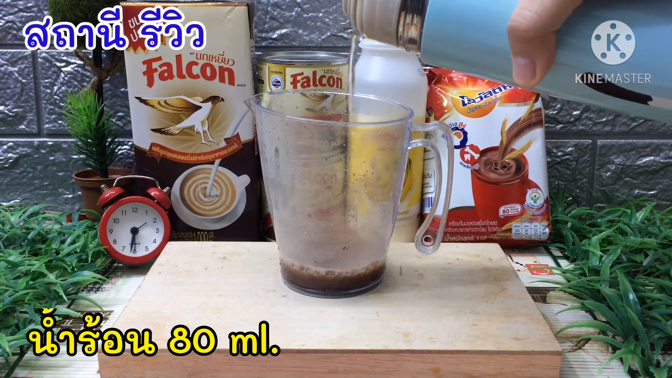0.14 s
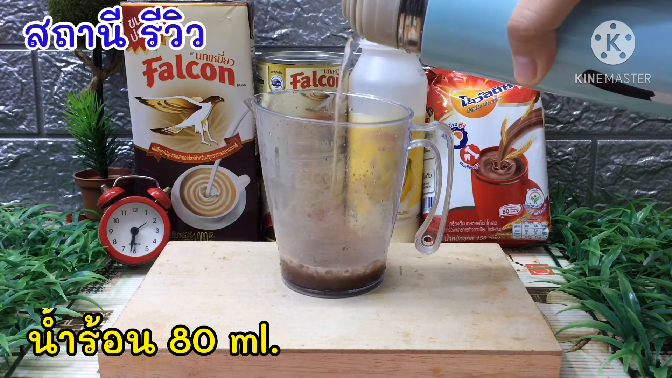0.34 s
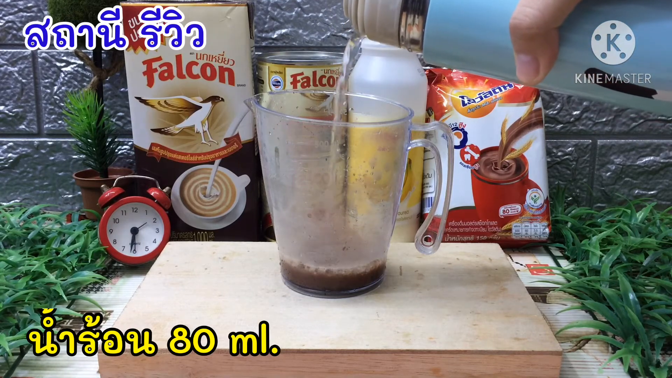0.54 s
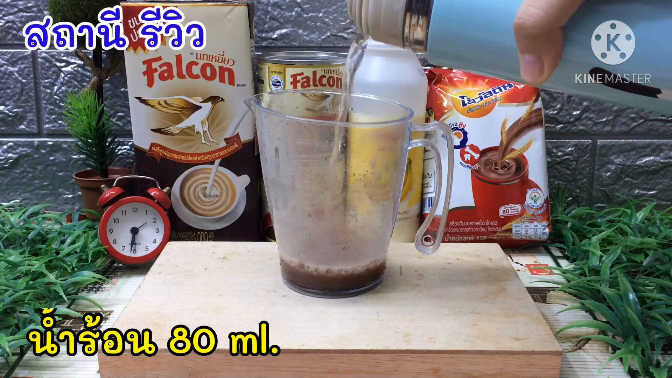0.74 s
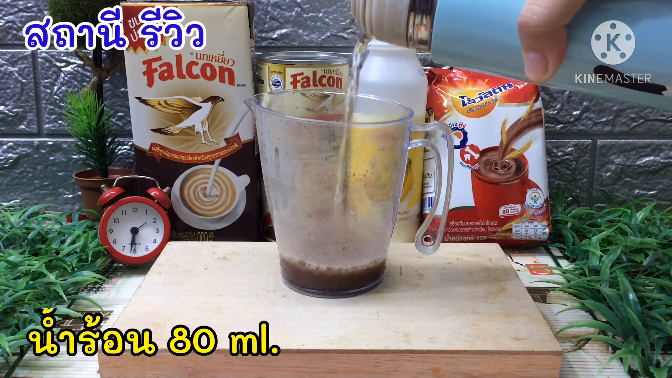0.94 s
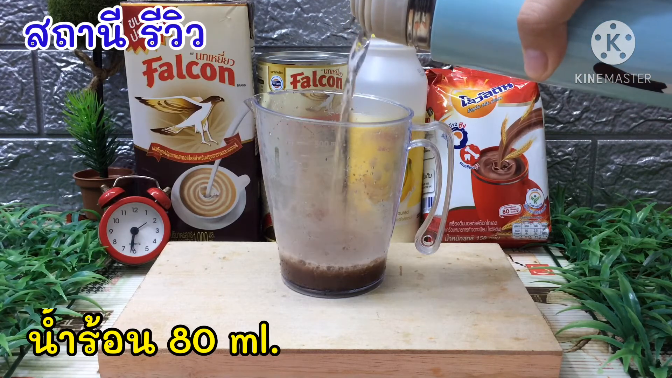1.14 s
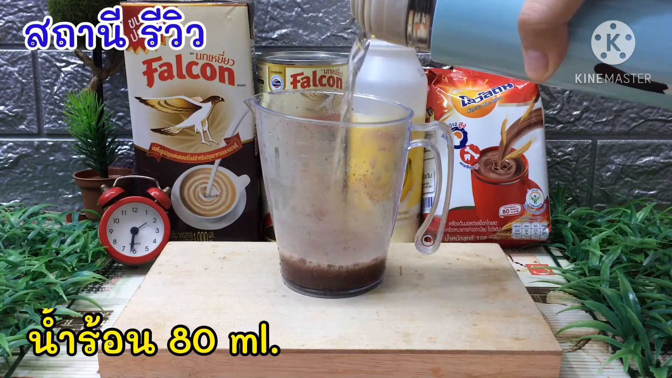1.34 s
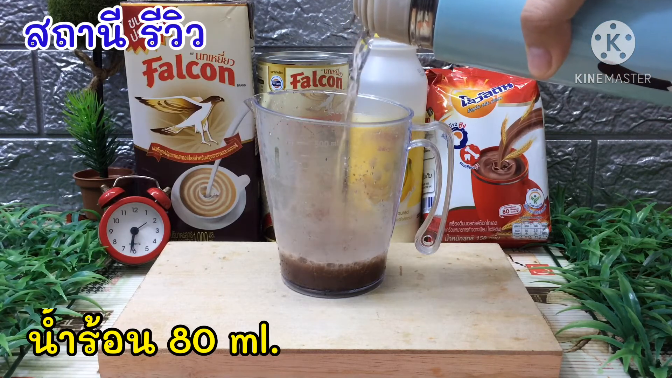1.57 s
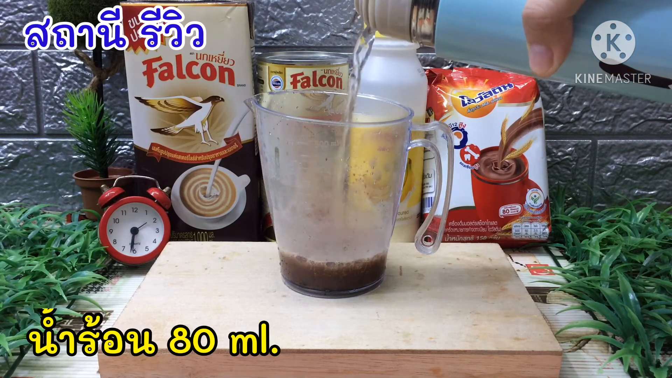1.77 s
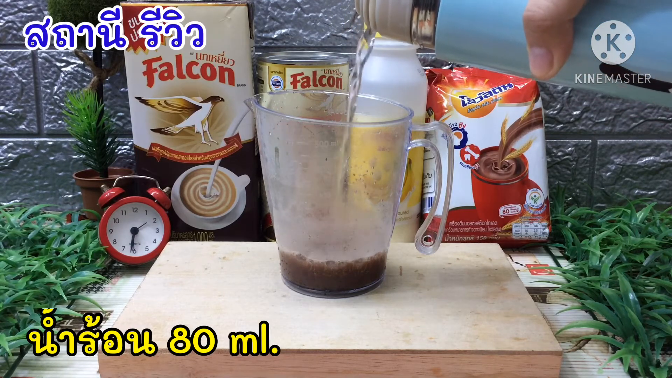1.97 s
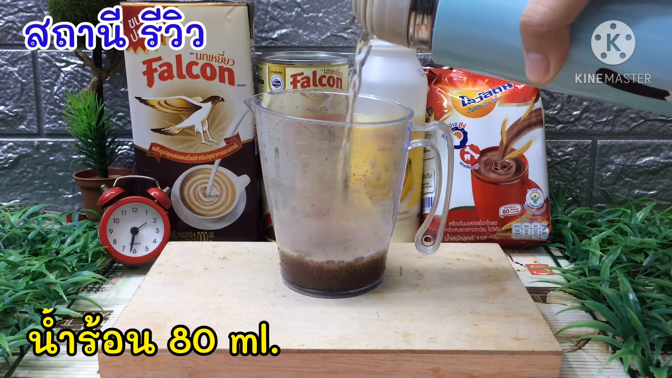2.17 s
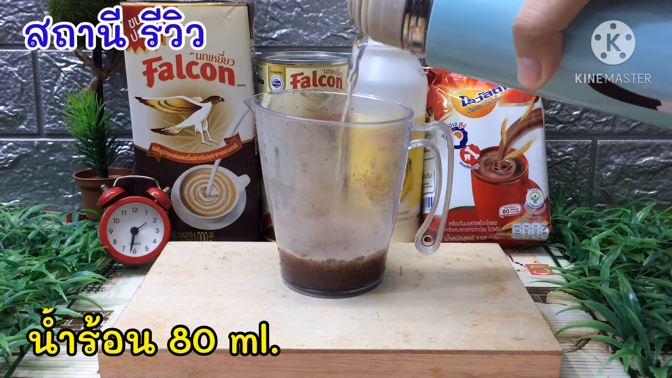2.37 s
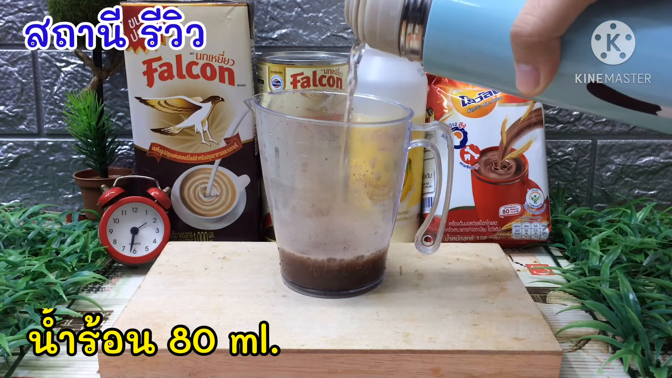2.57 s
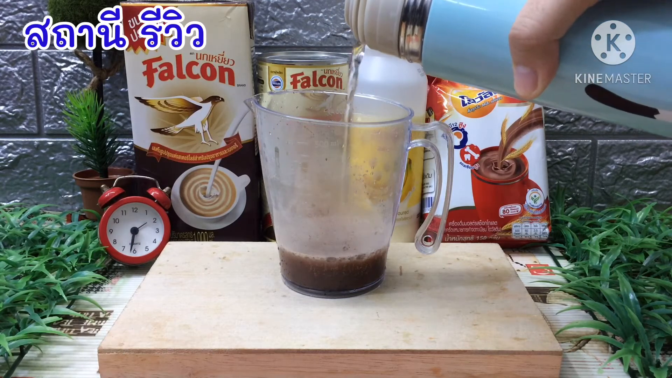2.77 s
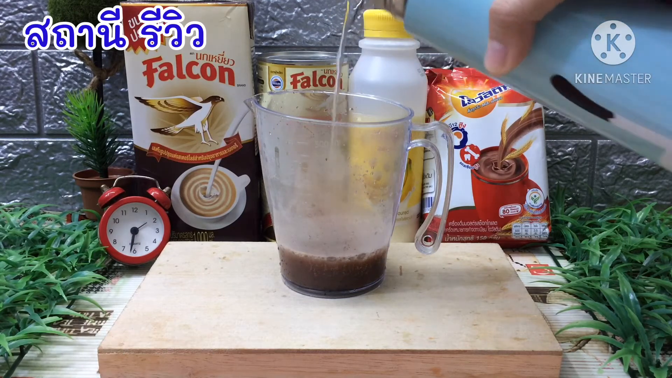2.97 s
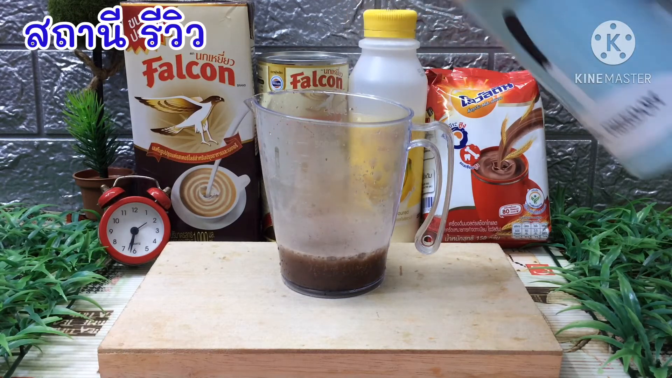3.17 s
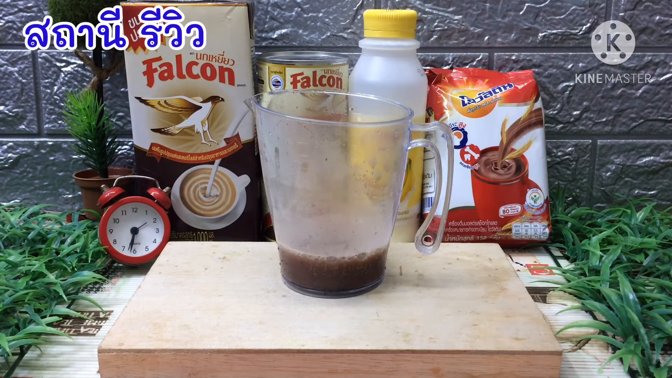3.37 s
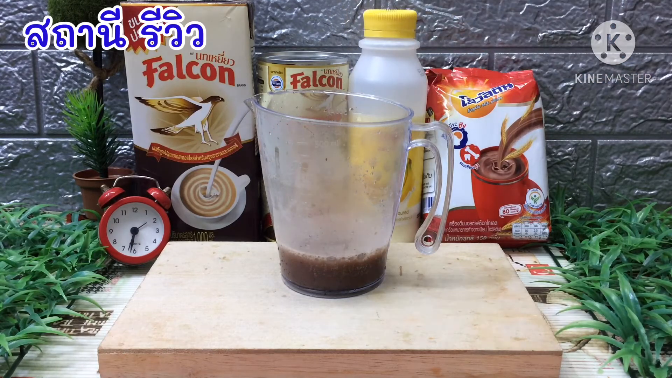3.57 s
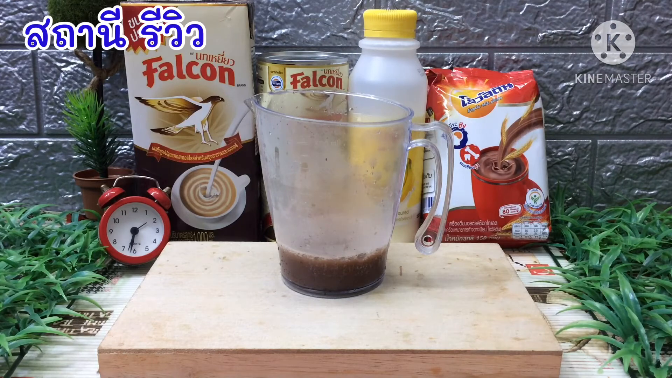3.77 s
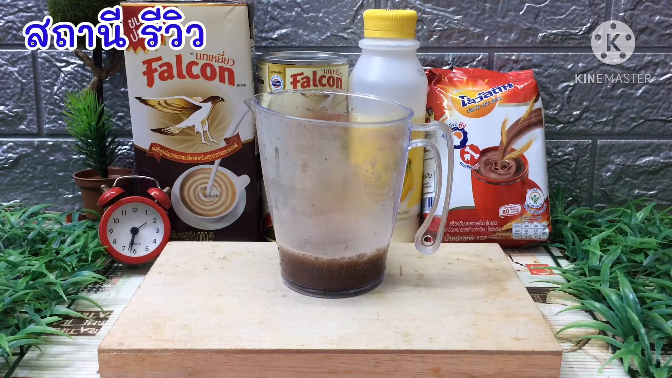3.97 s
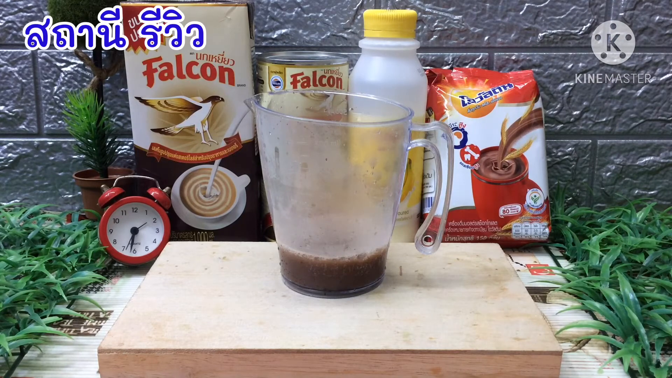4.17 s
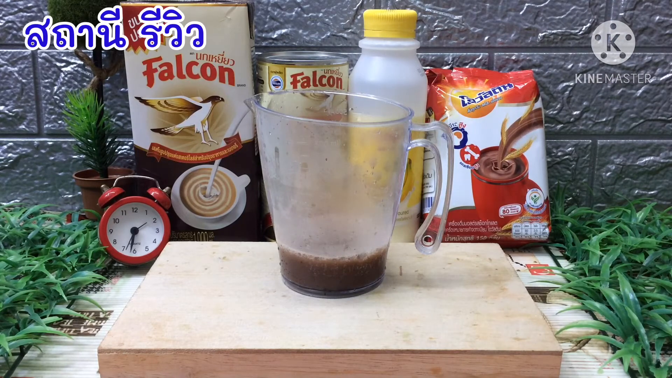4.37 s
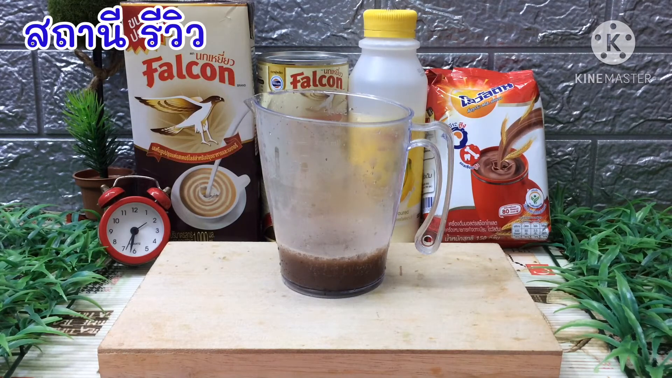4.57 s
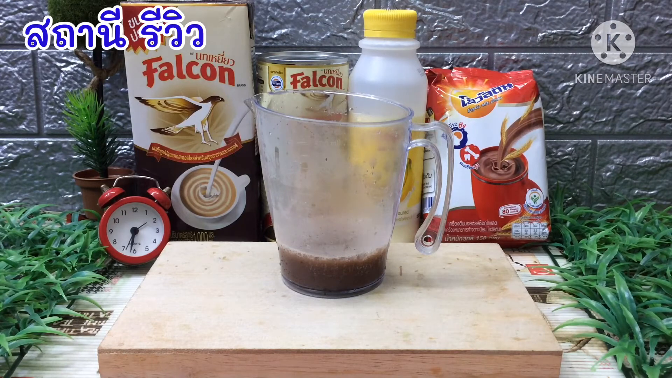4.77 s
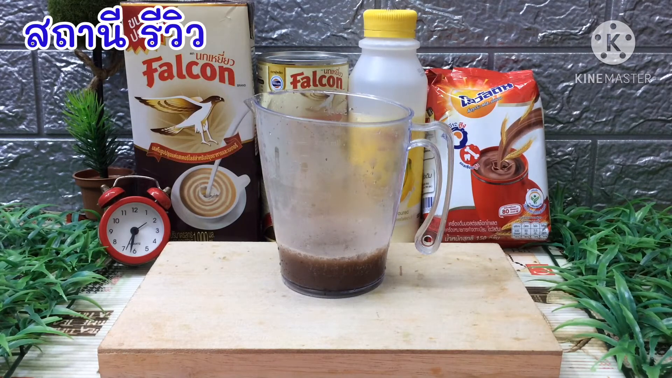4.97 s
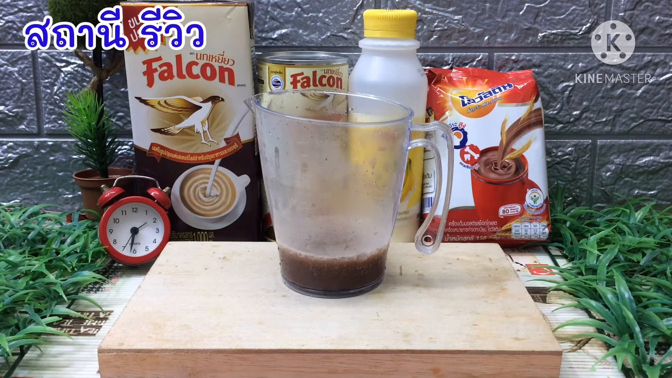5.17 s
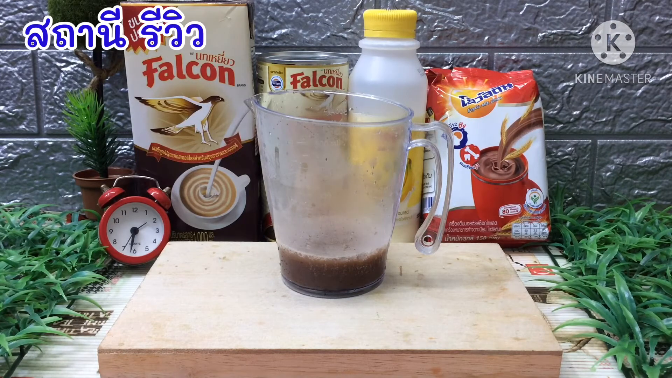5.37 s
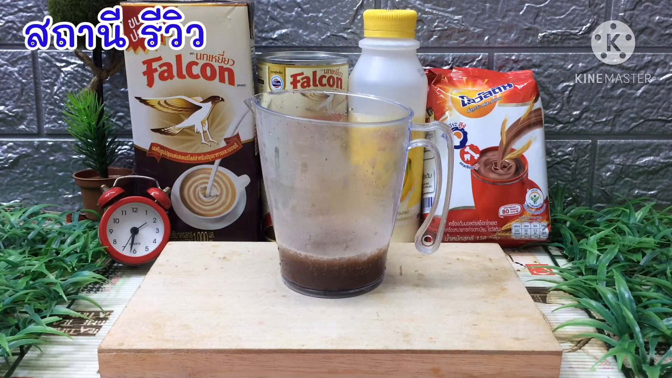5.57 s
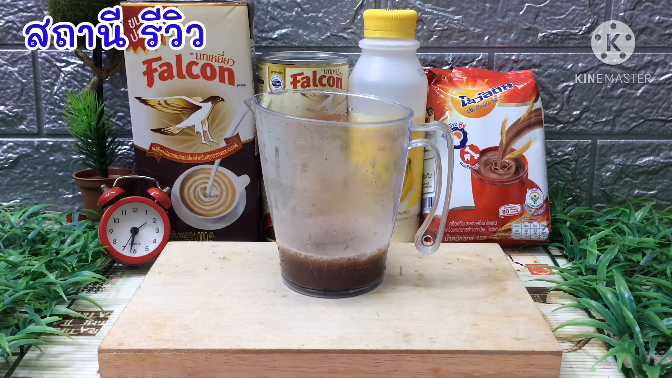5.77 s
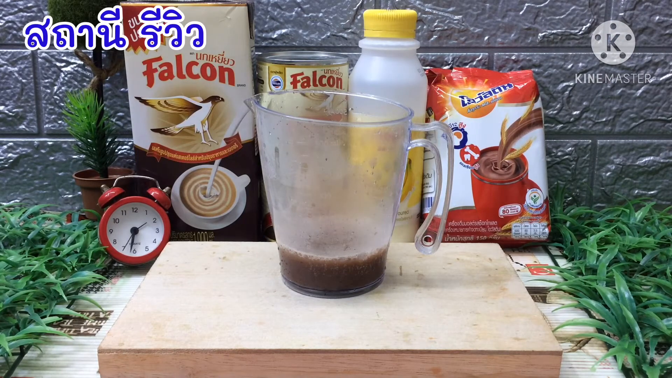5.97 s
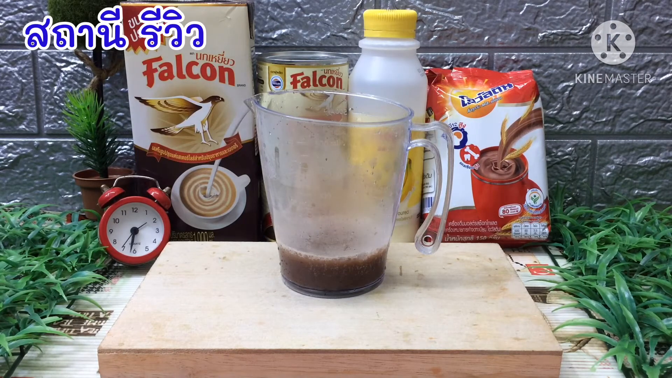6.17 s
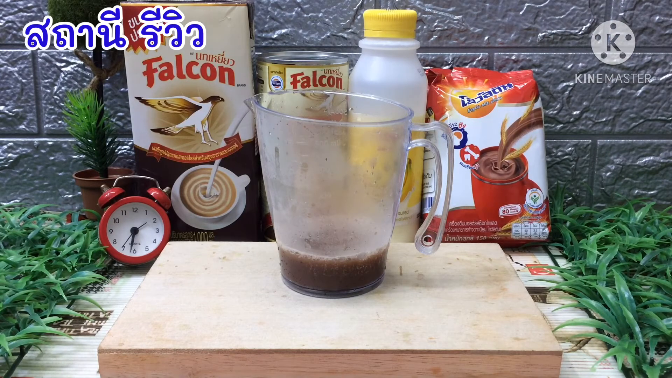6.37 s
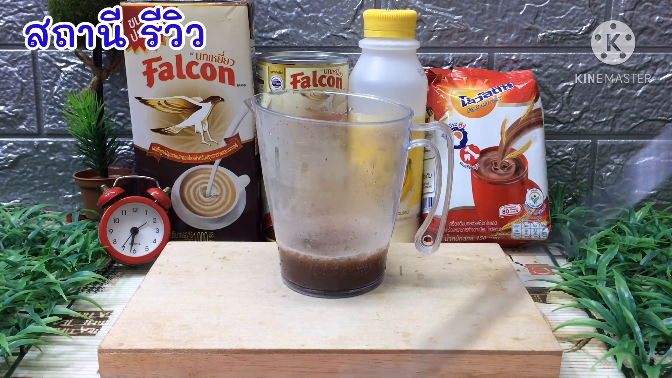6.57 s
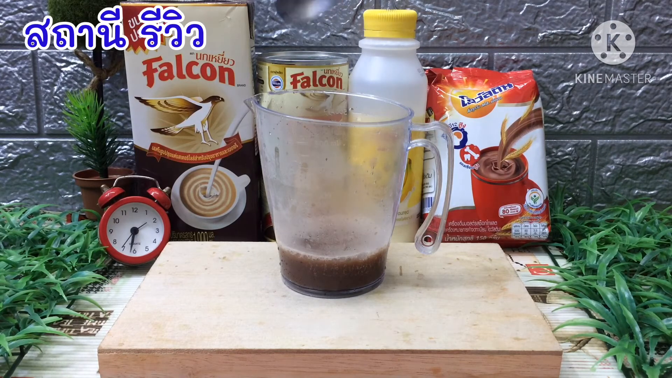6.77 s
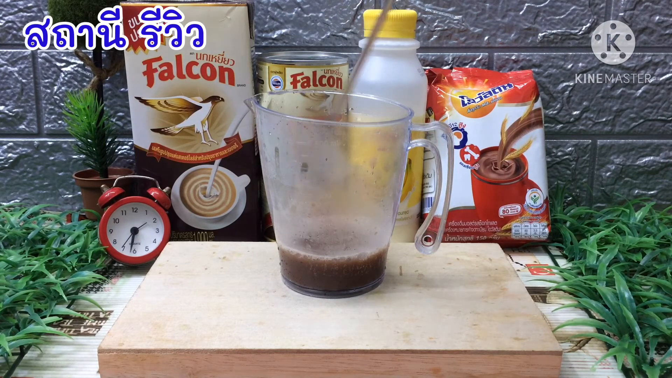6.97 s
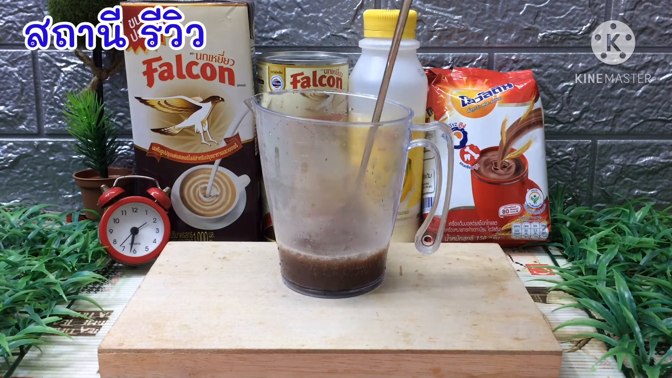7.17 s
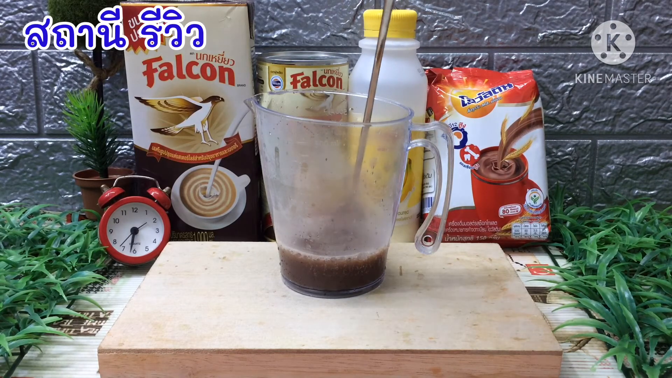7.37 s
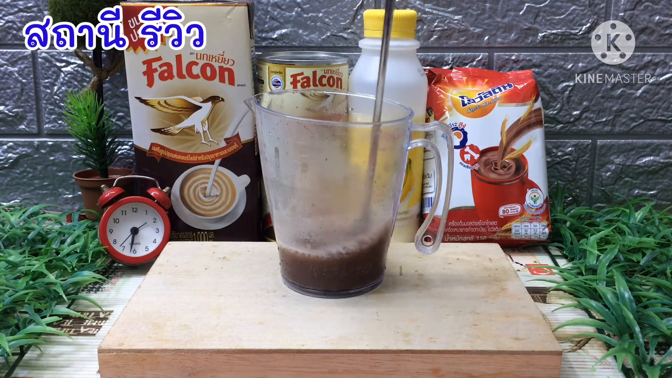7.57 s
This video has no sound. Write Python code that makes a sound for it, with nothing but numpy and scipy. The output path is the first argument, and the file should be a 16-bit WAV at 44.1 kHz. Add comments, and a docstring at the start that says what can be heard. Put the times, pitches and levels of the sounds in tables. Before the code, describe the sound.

In a small room, water trickles into a partly filled plastic jug for about three seconds, with uneven plops, bubbles and fine spray. After a pause, a steel flask thuds onto the table and rocks briefly. A spoon then clatters, is dragged up in short scrapes and gives the jug one sharp tap. The microphone is in front of the jug, with faint hum, hiss and rumble underneath.

```python
"""A thin stream of hot water falls from a steel flask into a little drink at the bottom of a plastic jug.
It breaks into lumps that plop, trap bubbles, fling spray and ring the jug, in a small room.
The flask is set down on the table with a knock; a spoon clatters, is dragged up and taps the jug.
Two small dull ticks sound along the way. Low rumble, a faint hum and hiss lie under everything,
and a low drone comes up towards the end."""
import sys
import numpy as np
from scipy import signal
from scipy.fft import rfft, irfft, next_fast_len
from scipy.io import wavfile
from scipy.ndimage import map_coordinates

SR = 44100
rng = np.random.default_rng(int(sys.argv[2]) if len(sys.argv) > 2 else 0)


def to_wav(s):
    """Save 16-bit WAV."""
    ch = np.atleast_2d(s).T  # columns
    pcm = np.round(np.clip(ch, -1, 1) * 32767)  # PCM
    wavfile.write(sys.argv[1], SR, pcm.astype(np.int16))


N = 336394
TIME = np.arange(N) / SR
RING = np.arange(SR * 3 // 4) / SR  # time within one hit's tail [s]
TOP_HZ = 15950


# air and wall resonances of the jug: (frequency [Hz], width [Hz], level [dB])
JUG_MODES = [(474, 8.9, 1), (524, 24, -16), (557, 22, 4), (606.4, 7.1, 4), (745.4, 8.9, 6.5),
             (761.6, 17, 4), (804, 44, -1.5), (972, 15, -9), (1130, 7.8, 0.5), (1234, 9.3, 4),
             (2300, 18, -14), (2350, 88, -24), (2465, 215, -4)]
def pour():
    """The stream breaks into lumps: each plops, traps a bubble, flings spray and rings the jug."""
    s, lump_db, lump_hz, bubble_db = lumps().T
    falls = np.transpose([s, lump_db, lump_hz])
    bubble_hz = 2343 * 2 ** (0.16 * rng.standard_normal(len(s)))  # all about the same size
    trapped = np.transpose([s, lump_db + bubble_db, bubble_hz])
    stir = bursts(falls, rise_s=0.0037, fade_s=0.022)  # each lump stirs the surface for a moment
    water = plunge(falls, trapped, stir)
    jug = amp(3.5) * resonate(water, JUG_MODES)
    # the air pocket left by a lump rings on at the same pitch
    glugs = amp(-11.5) * pings(falls, cycles=4.7, glide=0, size=3500)
    drops = spray(falls, stir)
    return room(water, wet_db=-2.5) + jug + glugs + room(drops, wet_db=2.5)


# big lumps hitting the drink: (time [s], level [dB], pitch [Hz], bubble send [dB])
BIG_LUMPS = [(0.4, -27.5, 746, -11), (0.494, -23, 748, -14), (0.536, -26, 786, -14),
             (0.573, -25.5, 756, -7), (0.665, -27, 610, -24), (0.883, -21.5, 750, -10),
             (1.051, -21.5, 760, -22), (1.118, -27, 737, -8.5), (1.133, -20.5, 740, -1),
             (1.331, -22, 759, -16.5), (1.405, -18.5, 759, -18), (1.487, -23.5, 553, -11.5),
             (1.677, -21, 723, -2), (1.849, -23.5, 1040, -6), (1.873, -21.5, 754, -5.5),
             (1.936, -19, 754, -26), (2.027, -23, 1030, -15), (2.09, -19, 765, -37),
             (2.14, -21.5, 495, -22), (2.154, -17.5, 767, -19), (2.242, -20, 546, -23),
             (2.283, -22, 727, -13.5), (2.297, -21.5, 474, -24), (2.32, -26, 532, -27),
             (2.411, -22.5, 1130, -7), (2.425, -18, 792, -27), (2.596, -25.5, 529, 0),
             (2.662, -20.5, 780, -24), (2.72, -19, 793, -14), (2.817, -26.5, 734, -2),
             (2.849, -20.5, 750, -6), (2.947, -19, 796, -15), (3.084, -16.5, 803, -13),
             (3.153, -26.5, 804, -14), (3.292, -33.5, 1095, -31)]
def lumps(per_s=11):
    """Small lumps fall about evenly among the big ones, as strong as the stream allows."""
    start, end = FLOW[0][0], FLOW[-1][0]
    count = int(per_s * (end - start))
    jitter, size, pitch, bubble = rng.standard_normal((count, 4)).T
    s = start + (np.arange(count) + 0.5 + 0.3 * jitter) / per_s
    db = flow_db(s) + 12.5 + 2.5 * size
    hz = 659 * 2 ** (0.255 * pitch)
    bubble_db = -9 + 3 * bubble
    return np.vstack([BIG_LUMPS, np.transpose([s, db, hz, bubble_db])])


# the stream swells, holds and thins out: (time [s], level [dB])
FLOW = [(0.3, -65), (0.37, -52.5), (0.58, -44.5), (0.85, -41), (2.17, -41), (3.02, -41.5), (3.15, -39),
        (3.28, -54), (3.36, -80)]
def flow_db(s, lull_db=5.5, lull_s=0.043):
    """Strength of the stream at times s; it necks just before each big lump."""
    big_times = np.append(np.sort(np.transpose(BIG_LUMPS)[0]), np.inf)
    wait = big_times[np.searchsorted(big_times, s)] - s
    lull = lull_db * np.exp(-(wait / lull_s) ** 2)
    return np.interp(s, *np.transpose(FLOW), left=-120, right=-120) - lull


# EQ on the plops and bubbles: (frequency [Hz], gain [dB])
WATER_EQ = [(100, -1.5), (350, -4.5), (520, 2), (800, 1), (1150, 3), (1450, -3), (2000, -2), (2700, 1),
            (3400, -13.5), (6000, 9), (15000, -7)]
def plunge(falls, trapped, stir):
    """Lumps punch into the drink: low plops, with trapped and churned-in bubbles ringing above."""
    churn = amp(flow_db(TIME) - 2.5) + amp(-27) * stir
    plops = amp(-2) * pings(falls, cycles=0.35, glide=0.0076)
    plops += amp(-5) * churn * swarm(per_s=260, centre_hz=725, spread=0.37, range_db=22, cycles=0.6)
    bubbles = amp(4.5) * pings(trapped, cycles=1.36, glide=0.017)
    bubbles += amp(-15) * clicks(trapped, t60=0.0073)
    bubbles += amp(-6) * churn * swarm(per_s=260, centre_hz=2192, spread=0.343, range_db=29, cycles=1.43)
    # a splash beats smaller bubbles into the drink
    froth = amp(-15) * bursts(SPLASHES, rise_s=0.0017, fade_s=0.02)
    bubbles += froth * swarm(per_s=400, centre_hz=2890, spread=0.254, range_db=20, cycles=1.7)
    return filtered(plops + bubbles, lambda hz: amp(along(WATER_EQ, hz)))


def swarm(per_s, centre_hz, spread, range_db, cycles):
    """Random bubbles ring while the water runs, at rms 1."""
    start, end = FLOW[0][0], FLOW[-1][0]
    when, size, pitch = rng.uniform(.001, .999, (int(per_s * (end - start)), 3)).T
    s = start + (end - start) * when
    hz = np.minimum(centre_hz * (pitch / (1 - pitch)) ** (spread / 2), TOP_HZ)
    bubbles = pings(np.transpose([s, -range_db * size, hz]), cycles, glide=0.1)
    return bubbles / np.std(bubbles[int(start * SR):int(end * SR)])


# EQ on the spray: (frequency [Hz], gain [dB])
SPRAY_EQ = [(500, -14), (2000, 1.5), (3500, -1), (5000, -7), (7200, -0.5), (9500, -5.5), (13500, -5),
            (16000, -15)]
def spray(falls, stir, growth=0.78, cushion_db_per_s=2):
    """Fine spatter crackles in gusts and after each lump, cushioned as the drink deepens."""
    mist = amp(-16.5 + growth * flow_db(TIME) - cushion_db_per_s * TIME + 2 * wobble(25.16))
    strays = droplets(mist)
    mist += amp(-36) * stir
    spatter = swarm(per_s=1100, centre_hz=8540, spread=0.66, range_db=60, cycles=0.83)
    fizz = swarm(per_s=220, centre_hz=4600, spread=0.552, range_db=36, cycles=2.8)
    out = mist * (amp(-7.5) * spatter + amp(-11.5) * fizz)
    out += strays + splashes(spatter) + amp(-30.5) * clicks(falls, t60=0.0081)
    return coloured(out, SPRAY_EQ)


def droplets(mist, per_s=14, over_mist_db=6.5, scatter_db=3):
    """Stray droplets tick on the wall at random, following the level of the mist."""
    start, end = FLOW[0][0], FLOW[-1][0]
    when, size = rng.random((int(per_s * (end - start)), 2)).T
    s = start + (end - start) * when
    db = 20 * np.log10(np.interp(s, TIME, mist)) + over_mist_db + scatter_db * (2 * size - 1)
    return clicks(np.transpose([s, db]), t60=0.0093)


# big splashes flung at the jug wall: (time [s], level [dB], relative sizzle [dB])
SPLASHES = [(0.5465, -36.5, -10.5), (0.74, -31, -20), (1.2062, -38.5, -14), (1.255, -33, -20),
            (1.721, -23, -11.5), (1.736, -27, -12), (1.7523, -28.5, -13), (2.0727, -31.5, -11),
            (2.283, -31.5, -21), (2.452, -29.5, -13), (2.5985, -40, -5), (2.9977, -27, -29),
            (3.265, -35.5, -22)]
def splashes(spatter, fade_s=0.016):
    """Each splash slaps the wall and scatters into a short shower of droplets."""
    out = np.zeros(N)
    for s, db, sizzle_db in SPLASHES:
        slap = decay(-10, t60=0.019) * rng.standard_normal(len(RING))
        shower = amp(-19) * np.exp(-RING / fade_s) * spatter[round(s * SR):][:len(RING)]
        add(out, s, amp(db) * brighter(slap + shower, sizzle_db + 13, corner_hz=8000))
    return out


# the flask meets the table: (time [s], level [dB], brightness [dB])
KNOCKS = [(4.6134, -12.5, 7.5), (4.6157, -6.5, -1.5), (4.662, -18, -12)]
# its steel ring, and the thud under it: (frequency [Hz], level [dB], t60 [s])
FLASK_MODES = [(146, -13, 0.44), (169.8, -2.5, 0.25), (208, -13, 0.21), (269, -10, .18), (354.7, -11, 0.29),
               (444, -2.5, 0.082), (758, -20, 0.13), (995, -8, 0.093), (1175, -13, 0.079),
               (1395, -25, 0.38), (1434, -13, 0.32), (2590, -33, 0.25), (2785, -30, 0.27),
               (3680, -31, 0.23), (4120, -38, 0.33), (5370, -44.5, .25)]
FLASK_THUD = [(40, -20, 0.73), (110, 7, .3), (170, 12, 0.39), (448, -2.5, 0.21), (706, 0.5, 0.19),
              (1380, -9, 0.31), (1780, -19, 0.2), (2680, -22, 0.24), (3960, -30.5, 0.31), (6000, -44, 0.25),
              (15000, -55, 0.33)]
# the table top booms as the flask rocks: (time [s], level [dB], pitch [Hz])
ROCKS = [(4.821, -31, 139), (4.849, -33.5, 139), (4.895, -31.5, 161.5)]
def flask():
    """The heavy flask lands on its rim, shoves the table top once, settles flat and rocks."""
    out = blows(KNOCKS, FLASK_MODES, FLASK_THUD, corner_hz=603, crack_db=6, wash_db=19.5, ring_db=-7)
    shove = partial(215, db=-9, t60=0.023) + partial(430, db=-7, t60=0.038)
    add(out, KNOCKS[1][0], shove)
    soft_attack = 1 - np.exp(-RING / 0.0053)
    for s, db, hz in ROCKS:
        add(out, s, soft_attack * partial(hz, db, t60=0.22))
    return out


# the spoon hits the table: (time [s], level [dB], brightness [dB])
CLATTERS = [(5.6428, -17, -2), (5.661, -27, -7), (5.668, -22.5, -6), (6.409, -35.5, 1), (7.5444, -38.5, -4)]
# its steel ring, and the clack under it: (frequency [Hz], level [dB], t60 [s])
SPOON_MODES = [(455, -16, 0.26), (600, -22, 0.32), (1123, -11, 0.13), (1368, -13.5, 0.29),
               (1940, -12.5, 0.16), (2144, -18, 0.2), (2380, -13.5, 0.21), (2490, -19, 0.23),
               (3010, -13, 0.16), (3320, -10, 0.15), (3670, -32, 0.33), (3810, -10.5, 0.066),
               (4170, -21, .3), (5030, -17.5, 0.1), (5900, -21, 0.15)]
SPOON_CLACK = [(150, -43, .2), (455, -7, 0.19), (1040, -3, 0.29), (2100, 1, 0.28), (3260, 6.5, 0.15),
               (4530, -8, 0.36), (5660, -8, 0.28), (8000, -16.5, 0.24), (15000, -22, 0.16)]
def spoon_clatter(gap_s=0.052, loss_db=4.5):
    """The spoon strikes the table; after the first clatter it rattles to rest."""
    rattle = [(5.709 + k * gap_s, -37 - k * loss_db, 3.5) for k in range(3)]
    hits = list(CLATTERS) + rattle
    return blows(hits, SPOON_MODES, SPOON_CLACK, corner_hz=2500, crack_db=6.5, wash_db=16.5, ring_db=-7.5)


# the spoon meets the jug: (time [s], level [dB], brightness [dB])
TAPS = [(7.1945, -14.5, 2.5)]
# the plastic's ring, and its snap: (frequency [Hz], level [dB], t60 [s])
PLASTIC_MODES = [(474, -10.5, 0.09), (517, -21, 0.26), (713, -13, 0.12), (942, -7.5, 0.076),
                 (1136, -9, 0.13), (1190, -20, 0.19), (1570, -6.5, 0.051), (2130, -15, 0.098),
                 (2670, -11, 0.085), (2680, -36, 0.42), (3760, -31, 0.12), (4300, -41, .14),
                 (5380, -25, .14)]
PLASTIC_SNAP = [(100, -9, 0.22), (250, -7.5, 0.27), (600, 3, 0.16), (1220, 0.5, 0.21), (1850, -6, 0.14),
                (2660, -1.5, 0.14), (3270, -24, 0.26), (4100, -2.5, 0.13), (4800, -19, 0.24),
                (6000, -8.5, 0.16), (9100, -17.5, 0.17), (15000, -24, 0.14)]
def jug_tap():
    """The spoon taps the jug and the plastic wall rings briefly."""
    return blows(TAPS, PLASTIC_MODES, PLASTIC_SNAP, corner_hz=2500, crack_db=6, wash_db=16, ring_db=-1.5)


# short drags over the table: (peak time [s], level [dB], swell [s], brightness [dB])
SLIDES = [(5.632, -53, 0.012, -6), (6.216, -40.5, 0.016, 4), (6.333, -40.5, 0.01, -4),
          (6.495, -49, 0.034, 2.5), (6.558, -40, 0.013, 5)]
def spoon_scrape(slips_per_s=700, width_hz=45, split_hz=3240, treble_lead_s=0.013):
    """The spoon's edge catches and slips; each stroke starts bright and dulls as it slows."""
    slips = (rng.random(N) < slips_per_s / SR) * rng.uniform(-1.54, 1, N)
    clack = coloured(slips, SPOON_CLACK)
    steel = resonate(slips, [(hz, width_hz, db) for hz, db, _ in SPOON_MODES])
    grit = unit(0.77 * unit(clack) + unit(steel) + amp(-15) * unit(slips))
    low = signal.lfilter(*signal.butter(2, split_hz, fs=SR), grit)
    high = signal.lfilter(*signal.butter(2, split_hz, "high", fs=SR), grit)
    rub = np.zeros(N)
    for s, db, swell_s, bright_db in SLIDES:
        body = low * np.exp(-((TIME - s) / swell_s) ** 2 / 2)
        treble = high * np.exp(-((TIME - s + treble_lead_s) / swell_s) ** 2 / 2)
        rub += amp(db) * (body - amp(bright_db) * treble)
    return amp(-4.8) * room(rub, wet_db=-4.5)


# small dull ticks: (time [s], level [dB], pitch [Hz])
TICKS = [(3.637, -37.5, 645), (6.4645, -22, 650)]
def ticks():
    """Tones damped so fast that they are heard as ticks."""
    return pings(TICKS, cycles=0.2, glide=0)


# spectra of the room tone: (frequency [Hz], relative level [dB])
RUMBLE = [(8.8, -49), (15, 7), (30, -3.5), (59, -13.5), (76, -20.5), (87, -21), (113, -25), (145, -17.5),
          (173, -29), (201, -24.5), (222, -34.5), (271, -37.5), (300, -27.5), (390, -81), (660, -120)]
HISS = [(150, -26), (250, -3.5), (325, -3), (421, -6.5), (640, -5), (1350, -14.5), (15200, -26),
        (16000, -17.5)]
# partials of the hum: (frequency [Hz], rms level [dB])
HUM = [(48, -49), (61, -57), (97, -59.5), (141, -64.5)]
# fader ride on the drone: (time [s], level [dB])
DRONE_FADER = [(5.8, -72), (6.15, -51.5), (6.85, -55.5), (7.6, -54)]
def background(drone_hz=141.6, drone_width_hz=15.6):
    """Steady rumble and hiss, with a wavering hum and a late low drone."""
    hum = np.zeros(N)
    for hz, db in HUM:
        peak = np.sqrt(2) * amp(db + 2.06 * wobble(3))
        hum += peak * np.sin(2 * np.pi * hz * TIME + 0.86 * wobble(5))
    drone = noise(lambda hz: np.exp(-((hz - drone_hz) / drone_width_hz) ** 2))
    drone *= amp(np.interp(TIME, *np.transpose(DRONE_FADER)))
    rumble = amp(-39.5) * noise(lambda hz: amp(along(RUMBLE, hz)))
    hiss = amp(-58) * noise(lambda hz: amp(along(HISS, hz)))
    return rumble + hiss + hum + drone


def room(x, wet_db):
    """The close back wall and the small room answer within a few milliseconds."""
    t60_by_hz = [(200, 0.58), (800, 0.31), (3000, 0.18), (8000, 0.1), (15000, 0.21)]
    tail = dying_noise(t60_by_hz) * np.clip(RING / 0.0011, 0, 1)
    return x + amp(wet_db) * signal.fftconvolve(x, tail)[:N]


def blows(contacts, modes, body, corner_hz, crack_db, wash_db, ring_db):
    """Each contact gives a sharp push, a dense wash of short resonances and the object's clear modes."""
    out = np.zeros(N)
    low_cut = signal.butter(2, 280, "high", fs=SR)  # resonances only crowd together above the bass
    for s, db, bright_db in contacts:
        wash = amp(wash_db) * signal.lfilter(*low_cut, dying_noise(body, column=2))
        wash[0] += amp(crack_db)
        ring = sum((-1) ** k * partial(hz, level + rng.normal(0, 1), t60)
                   for k, (hz, level, t60) in enumerate(modes))
        hit = coloured(wash, body) + amp(ring_db) * ring
        add(out, s, amp(db) * brighter(hit, bright_db, corner_hz))
    return out


def pings(rows, cycles, glide, size=900):
    """Damped tones from rows (s, dB, Hz); glide lifts the pitch, as when a bubble nears the surface."""
    s, db, hz = np.transpose(rows)[:, :, None]
    life = cycles * np.exp(rng.standard_normal((len(s), 1)) / 6) / hz
    t = np.arange(size) / SR
    age = t / life
    phase = 2 * np.pi * hz * (t + glide * (t - life * (1 - np.exp(-age))))
    tones = amp(db) * age * np.exp(1 - age) * np.sin(phase) * rng.choice([-1, 1], (len(s), 1))
    where = np.maximum((s * SR).astype(int), 0) + np.arange(size)
    return np.bincount(where.ravel(), tones.ravel(), N)[:N]


def clicks(rows, t60):
    """Very short noise bursts from rows (s, dB, ..)."""
    out = np.zeros(N)
    for s, db, *_ in rows:
        add(out, s, decay(db, t60) * rng.standard_normal(len(RING)))
    return out


def bursts(rows, rise_s, fade_s):
    """An envelope that jumps and fades at each row (s, dB, ..)."""
    out = np.zeros(N)
    for s, db, *_ in rows:
        add(out, s, amp(db) * np.exp(-RING / fade_s) * (1 - np.exp(-RING / rise_s)))
    return out


def decay(db, t60):
    """An envelope that falls 60 dB every t60 seconds."""
    return amp(db - 60 * RING / t60)


def partial(hz, db, t60):
    """One dying sine."""
    return decay(db, t60) * np.sin(2 * np.pi * hz * RING)


def dying_noise(decays, column=1, size=256):
    """Noise of energy 1 in which each frequency dies at its own speed."""
    hz, t, spectrum = signal.stft(rng.standard_normal(len(RING)), SR, nperseg=size)
    t60 = along(decays, hz, column)[:, None]
    tail = signal.istft(spectrum * amp(-60 * t / t60), SR, nperseg=size)[1][:len(RING)]
    return tail / np.linalg.norm(tail)


def noise(response):
    """Steady shaped noise at rms 1."""
    return unit(filtered(rng.standard_normal(N), response))


def resonate(x, modes):
    """Ring resonators (Hz, width Hz, dB) of alternating polarity."""
    return filtered(x, lambda f: sum((-1) ** k * amp(db) * hz * width / (hz * hz - f * f + 1j * f * width)
                                     for k, (hz, width, db) in enumerate(modes)))


def filtered(x, response):
    """Filter by a complex response of frequency."""
    size = next_fast_len(len(x) + SR // 2)
    return irfft(rfft(x, size) * response(np.fft.rfftfreq(size, 1 / SR)), size)[:len(x)]


def coloured(x, points, size=4096):
    """Causal filter of energy 1 with the given (Hz, dB) shape."""
    cepstrum = irfft(np.log(amp(along(points, np.fft.rfftfreq(size, 1 / SR)))))
    cepstrum[1:size // 2] *= 2
    cepstrum[size // 2 + 1:] = 0
    pulse = irfft(np.exp(rfft(cepstrum)))
    return signal.fftconvolve(x, pulse / np.linalg.norm(pulse))[:len(x)]


def brighter(x, db, corner_hz):
    """High shelf: lift or lower what lies above the corner."""
    low = signal.lfilter(*signal.butter(1, corner_hz, fs=SR), x)
    return low + amp(db) * (x - low)


def along(points, hz, column=1):
    """One column of a frequency table, read on a log axis."""
    columns = np.transpose(points)
    return np.interp(np.log(hz + 1), np.log(columns[0]), columns[column])


def wobble(rate):
    """A smooth random curve, rate knots a second."""
    return map_coordinates(rng.standard_normal(int(N * rate / SR) + 4), [TIME * rate])


def add(track, s, sound):
    """Mix a sound in at time s."""
    start = max(round(s * SR), 0)
    track[start:start + len(sound)] += sound[:N - start]


def amp(db):
    """Decibels to gain."""
    return 10 ** (np.asarray(db) / 20)


def unit(x):
    """Scale to rms 1."""
    return x / np.sqrt(np.mean(x ** 2) + 1e-20)


def scene():
    """Everything is heard in mono from in front of the jug."""
    return (ticks() + pour() + flask() + spoon_clatter() + jug_tap() + spoon_scrape() + background())[None]


def record(dry):
    """A brick-wall low-pass at TOP_HZ."""
    return np.array([filtered(channel, lambda hz: hz < TOP_HZ) for channel in dry])


dry = scene()
out = record(dry)
to_wav(out)
```